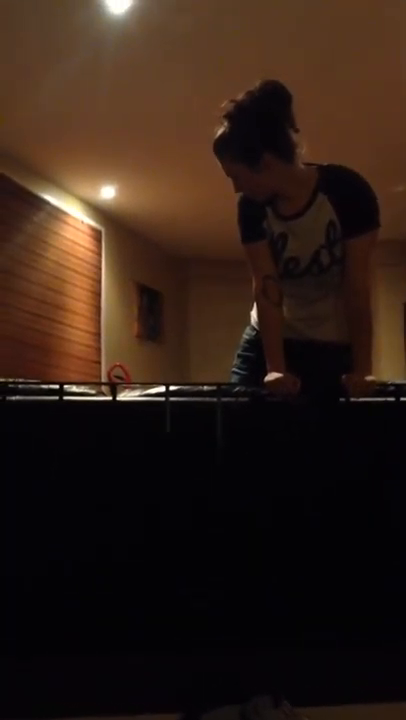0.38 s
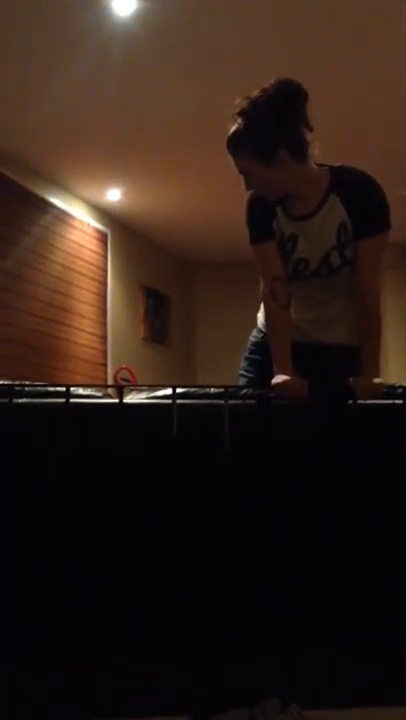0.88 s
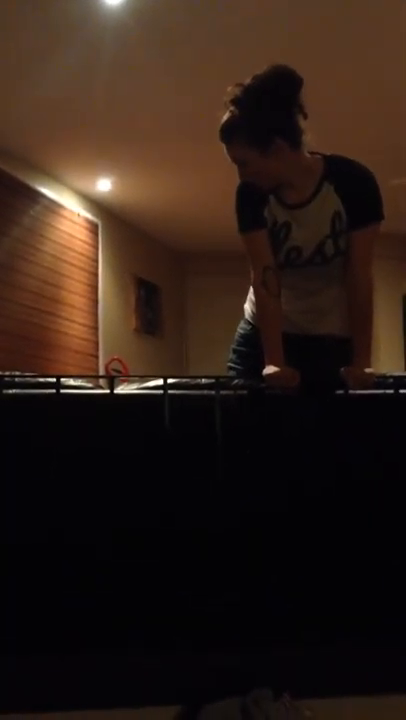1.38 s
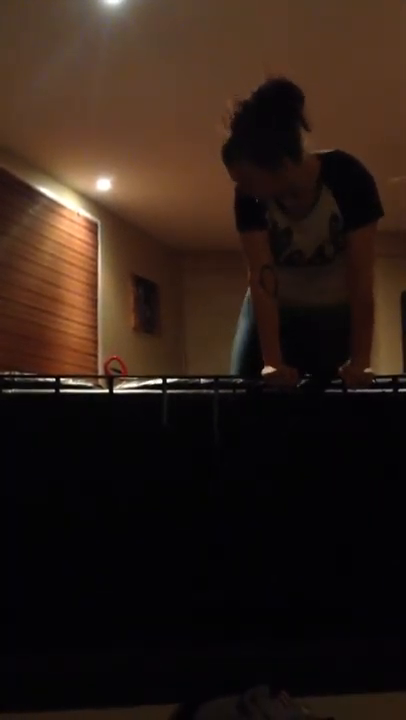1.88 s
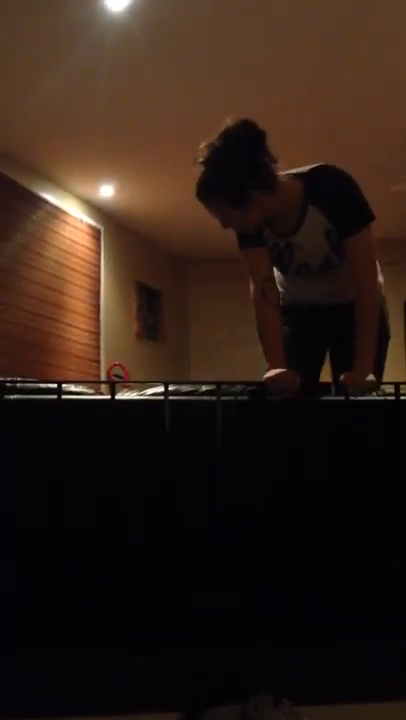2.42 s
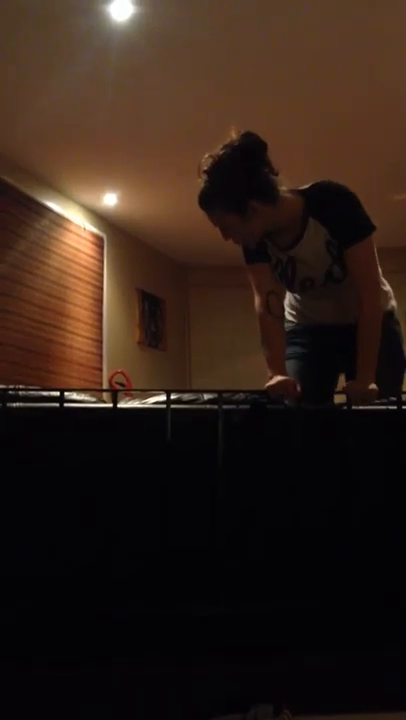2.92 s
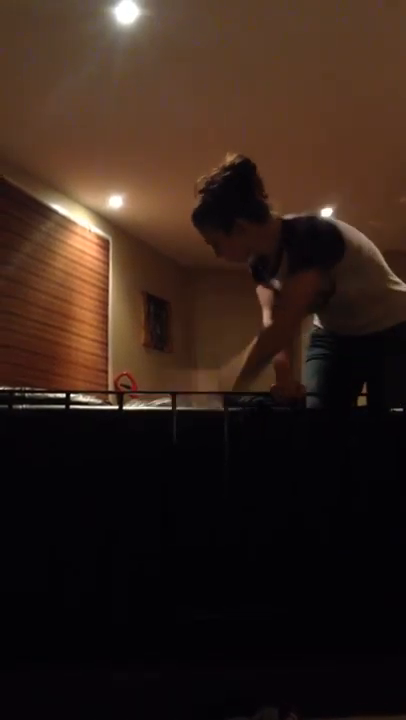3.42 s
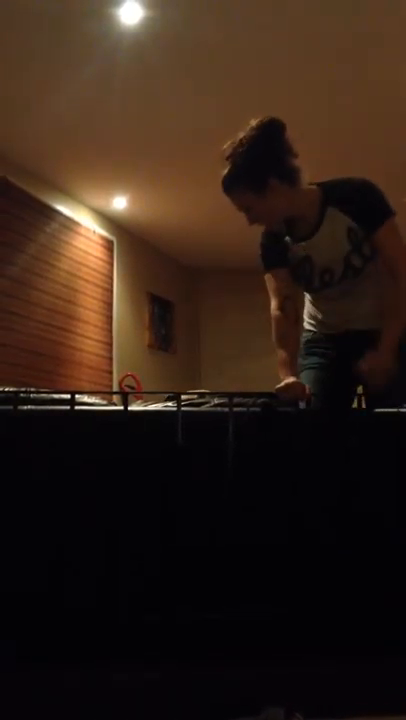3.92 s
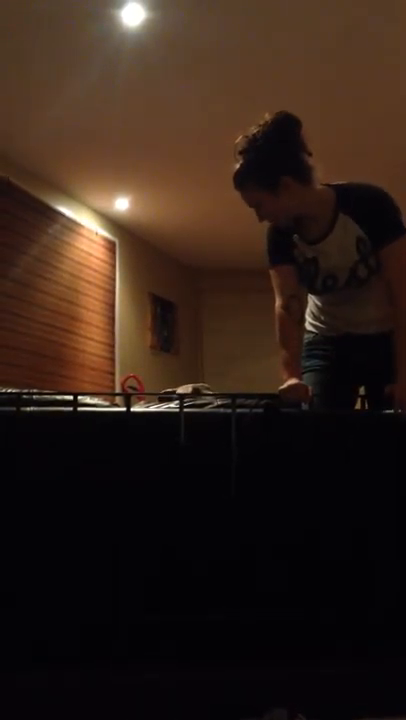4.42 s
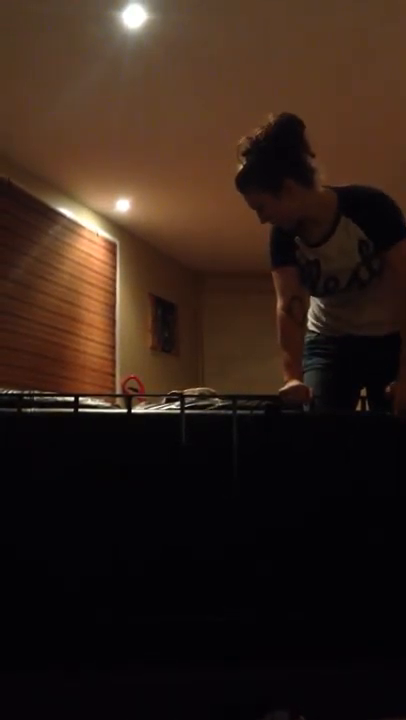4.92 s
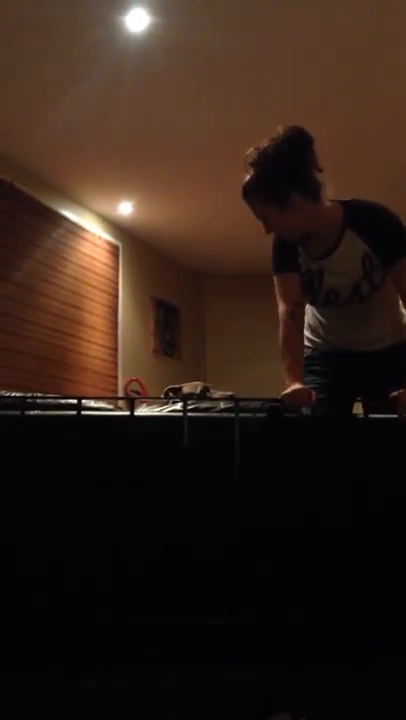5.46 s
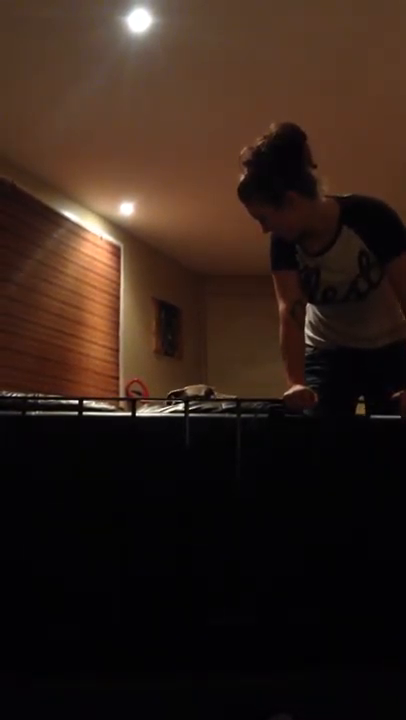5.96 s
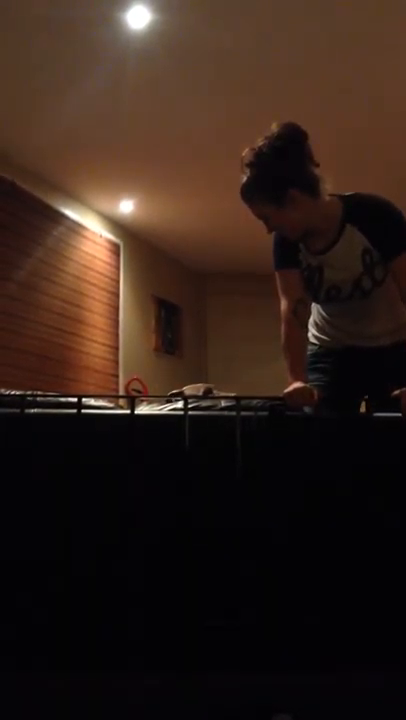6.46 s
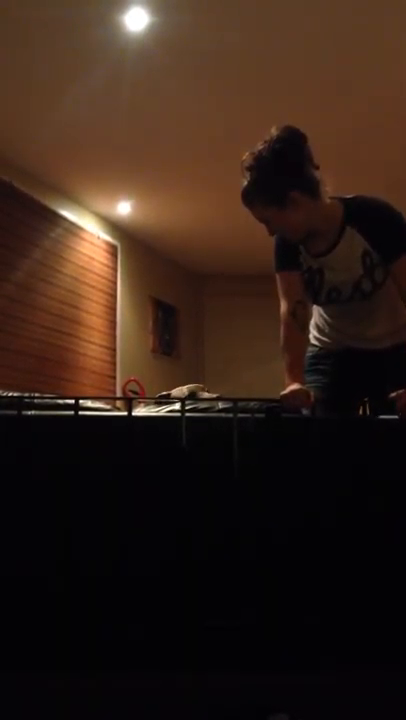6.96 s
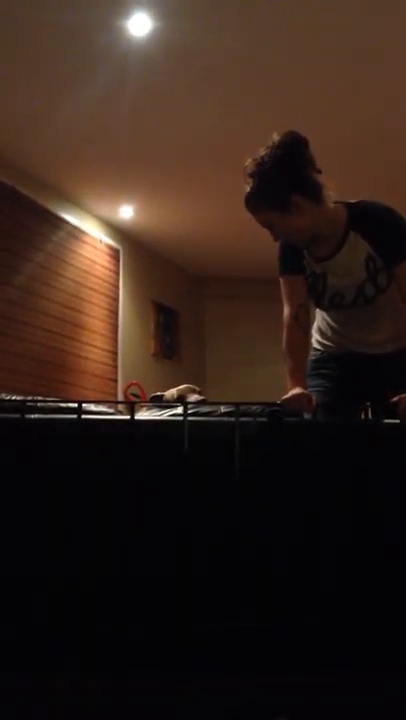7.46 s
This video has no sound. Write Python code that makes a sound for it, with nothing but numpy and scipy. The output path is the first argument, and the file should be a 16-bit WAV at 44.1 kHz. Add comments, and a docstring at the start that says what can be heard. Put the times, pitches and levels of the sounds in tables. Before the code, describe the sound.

Irregular padded thuds and bursts of rustling come first, densest in the opening second, with light claw clicks. After a lull and a second gentler scuffle, a thin ragged squeak hisses, then one sharp wooden clack far louder than everything rings through the room. Later a soft bump and tiny metallic clink, then almost nothing but low room hum. Close indoor microphone, slightly dull treble.

```python
"""A dog scuffles with hands in a pen on a hollow floor in a furnished room.
From the start paws and bodies shuffle and thump (grains, struck modes), fur and bedding rustle
(finer grains) and claws tick (noise bursts). At 2.9 s something squeaks with a puff of air (whistles
in hiss); at 3.45 s a hard knock rings through the room; at 5.03 s a small fitting clinks.
Then the moves grow sparse. Swells of deep rumble and a quiet room hum (shaped noise) lie below."""
import sys
import numpy as np
from scipy import signal
from scipy.fft import rfft, irfft
from scipy.io import wavfile

SR = 44100
rng = np.random.default_rng(int(sys.argv[2]) if len(sys.argv) > 2 else 0)


def boost_factor(decibels):
    """Convert a level in decibels to a linear amplitude factor."""
    exponent = np.asarray(decibels, float) / 20
    return 10 ** exponent


def master(y):
    """Save y as 16-bit WAV."""
    cut = np.clip(np.atleast_2d(y).T, -1, 1)
    pcm = np.round(cut * 32767)  # scale
    wavfile.write(sys.argv[1], SR, pcm.astype(np.int16))


N = 335298


def in_time(rows):
    """Interpolates rows of (t/s, values..) into one curve per value column."""
    t_s, *columns = np.transpose(rows)
    return [np.interp(np.arange(N) / SR, t_s, column) for column in columns]


def at_hz(points, hz):
    """Reads a spectrum on a log-frequency axis."""
    f_hz, value = np.transpose(points)
    return np.interp(np.log(hz), np.log(f_hz), value)


def rms_one(x):
    """Scales to unit rms."""
    return x / np.sqrt(np.mean(x ** 2) + 1e-20)


def drift(rate_hz):
    """Random drift of unit spread: noise through a two-pole low-pass, on every 40th sample."""
    pole = np.exp(-2 * np.pi * rate_hz * 40 / SR)
    noise = rng.standard_normal(N // 40 + 2002)
    slow = signal.lfilter([1], [1, -2 * pole, pole ** 2], noise)[2000:]   # skips the filter's start
    return np.interp(np.arange(N) / 40, np.arange(len(slow)), rms_one(slow))


def colour(x, spectrum):
    """Shapes a steady source to a spectrum; unit rms."""
    hz = np.maximum(np.arange(N // 2 + 1) * SR / N, 1.0)
    return rms_one(irfft(rfft(x) * boost_factor(at_hz(spectrum, hz)), N))


def grains(per_s, spread_db, clump_db, clumps_per_s):
    """Tiny slips of uneven size and random sign that come in clumps."""
    size_db = spread_db * np.minimum(rng.exponential(1, N), 5)
    slips = boost_factor(size_db) * rng.choice([-1, 1], N) * (rng.random(N) < per_s / SR)
    return slips * boost_factor(clump_db * drift(clumps_per_s))


def swells(rows, attack_share):
    """Rows rise to a peak and fall, linear in dB; powers add up, one gain curve per level column."""
    edge_db = 11.5   # drop at both ends of the length
    peak_s, length_s, *levels_db = np.transpose(rows)[:, :, None]
    t = np.arange(0, N + 64, 64) / SR
    late = (t - peak_s) / length_s
    shape_db = -edge_db * np.maximum(-late / attack_share, late / (1 - attack_share))
    curves = [np.sqrt(np.sum(boost_factor(db + shape_db) ** 2, axis=0)) for db in levels_db]
    return [np.interp(np.arange(N) / SR, t, curve) for curve in curves]


def ring(clicks, hz, t60_s):
    """A unit click sets a decaying sine of height 1 ringing in a two-pole resonator."""
    pole, w = boost_factor(-60 / (t60_s * SR)), 2 * np.pi * hz / SR
    return signal.lfilter([0, np.sin(w)], [1, -2 * pole * np.cos(w), pole ** 2], clicks + 1e-18)


def strike(times_s, strikes_db, modes, scatter_db):
    """Each blow shares its strength among the modes, a little differently every time."""
    at, out = np.round(np.asarray(times_s) * SR).astype(int), np.zeros(N)
    chance = rng.standard_normal((len(at), len(modes)))
    total = np.sum(boost_factor(np.array(modes)[:, 1]))
    for k, (hz, mode_db, t60_s) in enumerate(modes):
        clicks = np.zeros(N)
        clicks[at] = boost_factor(strikes_db + mode_db + scatter_db * chance[:, k]) / total
        out += ring(clicks, hz, t60_s)
    return out


def soften(x, hz):
    """A padded contact spreads the blow over time: low-pass."""
    return signal.sosfilt(signal.butter(2, hz, fs=SR, output="sos"), x)


ATTACK_SHARE = 0.4   # share of a swell's length spent rising
# shoves of bodies on the floor: peak t/s, length/s, boards level/dB, rubbing level/dB
SHOVES = [(0.055, 0.077, -43.5, -57), (0.118, 0.09, -64, -63), (0.22, 0.069, -62, -55),
          (0.27, .08, -50.5, -58.5), (0.33, .08, -56, -60), (0.433, 0.11, -47, -56),
          (0.477, 0.099, -40.5, -49), (0.652, 0.13, -41.5, -40), (0.808, 0.068, -35, -44.5),
          (0.922, 0.13, -41, -43.5), (1.002, 0.094, -43.5, -51.5), (1.19, .15, -53, -61.5),
          (1.502, 0.12, -55.5, -65), (1.95, 0.24, -58, -56), (2.129, 0.17, -44, -55.5),
          (2.229, 0.15, -48, -49), (2.333, 0.11, -65, -65), (2.491, 0.14, -57.5, -56),
          (2.72, 0.23, -59.5, -65), (3.05, 0.098, -54.5, -65), (3.145, 0.082, -51, -60),
          (3.343, 0.12, -53, -62), (3.91, 0.089, -66, -75), (4.108, 0.14, -60, -83),
          (4.224, 0.13, -59, -69), (4.99, .07, -56, -54), (5.085, .2, -42.5, -52),
          (5.192, 0.065, -64, -50.5), (5.242, 0.034, -50.5, -66), (5.317, 0.053, -54.5, -66),
          (5.646, 0.16, -57.5, -66.5), (5.998, 0.14, -60.5, -69), (6.61, 0.19, -69, -67)]
# strokes over fur and bedding: peak t/s, length/s, rustle level/dB, fine hiss level/dB
STROKES = [(0.052, 0.34, -74.5, -64), (0.209, 0.19, -69, -58), (0.302, 0.076, -63.5, -65),
           (0.404, 0.036, -57.5, -67), (0.461, 0.11, -57.5, -61.5), (0.61, 0.19, -61, -55.5),
           (0.52, 0.13, -61, -56), (0.667, 0.11, -50, -63), (0.826, 0.17, -58, -58),
           (0.927, 0.15, -53, -53.5), (1.05, 0.35, -62, -61), (1.41, 0.27, -76, -68),
           (1.908, 0.35, -60, -72), (2.037, 0.29, -55, -63.5), (2.17, .1, -56.5, -61),
           (2.243, 0.17, -55, -62.5), (2.46, 0.2, -65.5, -74), (2.73, 0.14, -80, -82),
           (3.142, 0.066, -58, -67), (3.192, .12, -69, -54), (3.245, 0.064, -62, -58.5),
           (3.357, 0.2, -59, -58), (3.947, 0.071, -78, -71.5), (4.095, 0.072, -81, -74.5),
           (4.213, 0.04, -73, -68), (4.965, 0.09, -65, -63), (5.035, 0.035, -68, -51.5),
           (5.103, .15, -57.5, -65), (5.172, 0.16, -59, -69), (5.35, 0.13, -71, -72),
           (5.66, 0.16, -74, -74.5), (6.017, 0.18, -78, -77)]
# landings that start a skid at once:
# peak t/s, length/s, boards level/dB, rubbing level/dB, rustle level/dB, fine hiss level/dB
SKIDS = [(0.57, 0.072, -39.5, -37.5, -60, -55.5), (4.928, .09, -46.5, -53, -64.5, -64)]
# faint fidgeting between the moves: t/s, level/dB
FIDGET = [(0, -61.5), (1.2, -68.5), (1.7, -64.5), (2.8, -66), (2.95, -68), (3.8, -68.5), (4.7, -72),
          (5.4, -72.5), (6.3, -73), (7.0, -70), (7.6, -75)]
# offset of fidgeting in boards, rubbing, rustle, hiss: level/dB
FIDGET_LAYERS_DB = [0, -3, -11, -10.5]
# spectra of the four layers: f/Hz, relative level/dB
BOARDS_SPECTRUM = [(29, -45), (50, -93), (124, -4), (189, 4.5), (258, 4.5), (302, -1.5), (404, -2.5),
                   (467, -6), (600, -15.5), (780, -46), (1320, -120)]
RUBBING_SPECTRUM = [(210, -27), (350, -6), (451, -6.5), (638, 0.5), (744, -5.5), (881, -4.5), (1130, -8),
                    (2200, -21), (2860, -34), (4840, -120)]
RUSTLE_SPECTRUM = [(880, 0), (1500, 2.5), (1870, 4.5), (3410, -1), (4670, -9.5), (5050, -22.5), (6500, -19),
                   (8450, -30), (14300, -120)]
HISS_SPECTRUM = [(2820, -8), (4800, 0), (5170, -2), (7390, -1.5), (10800, -13), (14700, -11),
                 (15500, -14.5)]


def scuffle():
    """Slips of paws boom in the boards; rubbing, rustle and hiss are ever finer grains."""
    fidget_db = in_time(FIDGET)[0]
    moves = swells(SHOVES, ATTACK_SHARE) + swells(STROKES, ATTACK_SHARE)   # lists join: four layers
    skids = swells(SKIDS, attack_share=0.03)
    gains = []
    for move, skid, layer_db in zip(moves, skids, FIDGET_LAYERS_DB):
        fidget = boost_factor(fidget_db + layer_db + 3.0 * drift(9))
        gains.append(np.hypot(np.hypot(move, skid), fidget))
    boards, rubbing, rustle, hiss = gains
    boom = colour(grains(900, 2.2, clump_db=1.2, clumps_per_s=25), BOARDS_SPECTRUM)
    rub = colour(grains(2500, 2.2, clump_db=0.0, clumps_per_s=20), RUBBING_SPECTRUM)
    stroke = grains(14000, 1.65, clump_db=0.4, clumps_per_s=40)   # shared by rustle and hiss
    strokes = rustle * colour(stroke, RUSTLE_SPECTRUM) + hiss * colour(stroke, HISS_SPECTRUM)
    return boards * boom + rubbing * rub + strokes


# soft thumps of paws: t/s, strike level/dB, hardness/dB (panels relative to floor)
THUMPS = [(0.045, -44, -18), (0.218, -46, -16), (0.264, -51, -14), (0.388, -38.5, -8), (0.436, -47, -11),
          (0.476, -31, -15), (0.573, -45, -6), (0.649, -47, -9), (0.799, -37, -9), (0.86, -32, -9),
          (0.989, -49, -13), (1.178, -43, -3), (1.498, -46, -12), (2.096, -46, -16), (2.485, -39, -3),
          (3.031, -45, -12), (3.314, -45, -11), (4.925, -40.5, -19)]
# ringing of the pen floor, of the pen panels: f/Hz, relative level/dB, t60/s
FLOOR_MODES = [(194, -14.5, 0.038), (221, -6, 0.01), (264.3, 5.5, 0.088), (334, -9, 0.037),
               (413, -7, 0.021), (494, 4.5, 0.018)]
PANEL_MODES = [(690, -22, 0.014), (980, -7, 0.016), (1040, 8, 0.013), (1256, 20, 0.0081),
               (1430, 9.5, 0.022), (1760, -7, 0.0067), (2070, 12.5, 0.011), (2600, 1, 0.024),
               (3230, -1, 0.03), (4700, -37, 0.01), (6100, 10.5, 0.0079)]


def thumps():
    """A padded paw rings the floor; a harder landing wakes the pen panels more."""
    t_s, strike_db, hard_db = np.transpose(THUMPS)
    floor = soften(strike(t_s, strike_db, FLOOR_MODES, scatter_db=3.0), hz=700)
    panels = soften(strike(t_s, strike_db + hard_db, PANEL_MODES, scatter_db=3.0), hz=1800)
    return floor + panels


# claw ticks: t/s, peak level/dB, ring f/Hz, fade/s (to 1/e)
TICKS = [(0.4414, -63, 2780, 0.006), (0.5064, -48, 6510, 0.006), (0.8964, -47, 3160, 0.006),
         (0.9394, -37, 2810, 0.0053), (2.0304, -55, 3150, 0.006), (2.1455, -52, 3420, 0.006),
         (2.8164, -53, 5200, 0.006), (2.823, -50, 8900, 0.009), (4.0891, -60, 5340, 0.006),
         (4.2103, -70, 3400, 0.0053), (4.22, -69, 3800, 0.0048), (4.927, -59, 4540, 0.0055),
         (5.0313, -40, 3040, 0.011)]


def ticks():
    """A claw gives a few ms of bright noise, strongest around its own ring."""
    out, t = np.zeros(N), np.arange(2000) / SR
    noise = rng.standard_normal((len(TICKS), 2000))
    for (t_s, peak_db, hz, fade_s), burst in zip(TICKS, noise):
        near = signal.butter(2, [hz * 0.87, hz * 1.19], "band", fs=SR, output="sos")
        bright = signal.butter(2, hz * 0.34, "high", fs=SR, output="sos")
        burst = burst * np.exp(-t / max(fade_s, 0.001))
        tick = signal.sosfilt(near, burst) + boost_factor(-8.0) * signal.sosfilt(bright, burst)
        at = round(t_s * SR)
        out[at:at + 2000] += boost_factor(peak_db) * tick / np.max(np.abs(tick))
    return out


# short ring of a struck tag or fitting: f/Hz, relative level/dB, t60/s
CLINK_MODES = [(1710, -3, 0.045), (2740, 0, .06), (3150, -0.5, 0.055), (4050, -4, 0.063)]


def clink():
    """Three quick touches, each weaker, ring a small fitting."""
    touch = np.arange(3)
    return strike(5.031 + 0.0045 * touch, -41.5 - 4.6 * touch, CLINK_MODES, scatter_db=3.0)


# main whistle and its air: t/s, pitch f/Hz, tone level/dB, air level/dB
SQUEAK = [(2.908, 4500, -61, -42), (2.914, 5300, -54, -38), (2.930, 5250, -45, -45),
          (2.942, 4950, -37.5, -43), (2.958, 4750, -38.5, -32.5), (2.966, 4600, -55, -34),
          (2.980, 4750, -36.5, -36), (3.005, 4820, -50, -37.5), (3.04, 4500, -73, -50)]
# overtones of the main whistle: multiple of pitch, level/dB
SQUEAK_ORDERS = [(1, -0.5), (2, -2.5), (3, -10)]
# rougher whistle sinking below, steadier one above: t/s, pitch f/Hz, level/dB
LOWER_STRAND = [(2.908, 4700, -55), (2.93, 4680, -55), (2.955, 4360, -53), (2.975, 3930, -53),
                (3.0, 4150, -54), (3.04, 4100, -61.5)]
UPPER_STRAND = [(2.908, 5300, -61), (2.92, 5370, -49), (2.95, 5380, -52), (2.97, 5230, -56),
                (3.04, 5200, -70)]
# air spectrum: f/Hz, relative level/dB
SQUEAK_AIR = [(2600, -30.5), (3300, -22.5), (3800, -15), (4500, -34), (5600, -6), (6300, -15), (7500, -7.5),
              (8800, -4), (11000, -7.5), (13200, -7), (15000, -3)]


def ragged_phase(hz, depth, rate_hz):
    """Phase of a whistle whose pitch wavers at random by a share (depth)."""
    return 2 * np.pi * np.cumsum(hz * (1 + depth * drift(rate_hz))) / SR


def squeak():
    """Air forced through a narrow slit: ragged whistles with overtones inside a bright hiss."""
    hz, tone_db, air_db = in_time(SQUEAK)
    lower_hz, lower_db = in_time(LOWER_STRAND)
    upper_hz, upper_db = in_time(UPPER_STRAND)
    t = np.arange(N) / SR
    opening = np.clip((t - SQUEAK[0][0]) / 0.0013, 0, 1)
    closing = np.clip((SQUEAK[-1][0] - t) / 0.015, 0, 1)
    phase = ragged_phase(hz, 0.034, 320)
    tone = 0
    for order, order_db in SQUEAK_ORDERS:
        tone = tone + boost_factor(order_db + 2.5 * drift(150)) * np.sqrt(2) * np.sin(order * phase)
    lower = np.sqrt(2) * np.sin(ragged_phase(lower_hz, 0.05, 300))
    upper = np.sqrt(2) * np.sin(ragged_phase(upper_hz, 0.025, 300))
    air = colour(rng.standard_normal(N) * boost_factor(1.1 * drift(90)), SQUEAK_AIR)
    whistles = boost_factor(tone_db) * tone + boost_factor(lower_db) * lower + boost_factor(upper_db) * upper
    return opening * closing * (whistles + boost_factor(air_db) * air)


# knock as tick, blow and two bounces: t/s, low thud strike level/dB, crack strike level/dB
KNOCK = [(3.4496, -43, -17), (3.4506, -5.5, -6), (3.4559, -2.5, -4), (3.4608, -8.5, -10)]


def knock():
    """Thud in the floor, clack in the panels and a broad crack at every stage; then chatter."""
    gap_s, loss_db = 0.0057, 3   # per chatter after the last bounce
    chatter = [np.add(KNOCK[-1], [k * gap_s, -k * loss_db, -k * loss_db]) for k in range(1, 4)]
    t_s, thud_db, crack_db = np.transpose([*KNOCK, *chatter])
    thud = soften(strike(t_s, thud_db, FLOOR_MODES, scatter_db=1.0), hz=850)
    clack = soften(strike(t_s, crack_db, PANEL_MODES, scatter_db=2.5), hz=6000)
    touch = np.zeros(N)
    touch[np.round(t_s * SR).astype(int)] = boost_factor(crack_db)
    fading = signal.lfilter([1], [1, -np.exp(-1 / (0.00099 * SR))], touch + 1e-18)   # 0.99 ms to 1/e
    band = signal.butter(1, [600, 7000], "band", fs=SR, output="sos")
    splinter = signal.sosfilt(band, rng.standard_normal(N))
    return thud + clack + boost_factor(-8.5) * fading * splinter


# what the walls return of the knock: f/Hz, relative level/dB
KNOCK_ECHO = [(53, -38), (90, -18), (176, -3), (342, -3), (381, -12), (424, -3.5), (682, -13.5),
              (1100, -13), (1800, -18), (6010, -23.5), (15500, -40)]


def echo():
    """The walls smear the knock into one smooth dying roar."""
    blow = np.zeros(N)
    blow[round(KNOCK[1][0] * SR) + 100] = 1
    return boost_factor(-47.5) * colour(room(blow), KNOCK_ECHO)


# reverberation time: f/Hz, t60/s
ROOM_T60 = [(100, 0.31), (260, 0.42), (700, 0.48), (1840, 0.53), (4850, 0.43), (12800, 0.29)]


def room(x):
    """Dense reflections build up over a few ms and die away band by band."""
    edges_hz = 30 * 2 ** np.arange(0, 9.1, 1 / 3)   # third octaves
    t = np.arange(SR) / SR
    white, tail = rng.standard_normal((2, SR)), 0
    for k, (low, high) in enumerate(zip(edges_hz, edges_hz[1:])):
        sos = signal.butter(2, [low, high], "band", fs=SR, output="sos")
        band = signal.sosfilt(sos, white[k % 2])   # neighbours get independent noise
        tail = tail + band * boost_factor(-60 * t / at_hz(ROOM_T60, np.sqrt(low * high)))
    tail = tail * (1 - np.exp(-t / 0.0042))
    return signal.fftconvolve(x, tail / np.sqrt(np.sum(tail ** 2)))[:N]


# swells of the building's deep rumble: peak t/s, length/s, level/dB
RUMBLE = [(0.08, 0.12, -61), (0.3, .3, -69), (0.65, 0.31, -58), (0.89, .35, -61), (1.25, 0.21, -67),
          (1.61, 0.37, -74), (1.9, 0.16, -71), (2.2, 0.24, -59.5), (2.4, 0.66, -69.5), (3.4, .2, -69),
          (3.51, 0.13, -46.5), (4.3, .5, -73.5), (5.12, 0.28, -54.5), (5.4, 0.7, -67), (6.1, 0.68, -73),
          (6.7, 0.49, -73), (7.12, 0.47, -73.5)]
# rumble spectrum: f/Hz, relative level/dB
DEEP = [(30, -30), (50, -39), (70, -8.5), (95, -9), (120, 5), (140, -1), (180, -40)]


def rumble():
    """The building rumbles in swells of deep noise."""
    return swells(RUMBLE, ATTACK_SHARE)[0] * colour(rng.standard_normal(N), DEEP)


# hum spectrum: f/Hz, relative level/dB
HUM_SPECTRUM = [(18, -79.5), (30, -25), (90, -32), (108, -11.5), (168, -13.5), (202, 1.5), (225, -6),
                (379, -1.5), (443, -4.5), (622, -3.5), (1140, -9), (1230, -16), (1400, -13.5), (9430, -31),
                (15500, -27)]


def hum():
    """Quiet room hum: steady shaped noise."""
    return boost_factor(-65.5) * colour(rng.standard_normal(N), HUM_SPECTRUM)


def scene():
    """Moves, squeak and knock are heard direct and from the walls, above rumble and hum."""
    whistle = squeak()
    bustle = scuffle() + thumps() + ticks() + clink()
    walls = echo() + room(boost_factor(-7.5) * whistle + boost_factor(-11.5) * bustle)
    # the boards radiate little below their first mode
    high_pass = signal.butter(5, 100, "high", fs=SR, output="sos")
    near = signal.sosfilt(high_pass, knock() + whistle + bustle + walls)
    return (near + rumble() + hum())[None]


def band_limit(x):
    """A steep low-pass at the top of the band."""
    return signal.sosfilt(signal.butter(12, 16460, fs=SR, output="sos"), x)


def record(dry):
    """A steep low-pass cuts the top of the treble: 50 dB down from 15.7 kHz."""
    dull = signal.sosfilt(signal.cheby2(14, 50, 15700, fs=SR, output="sos"), dry)
    return band_limit(dull)


dry = scene()
out = record(dry)
master(out)
```